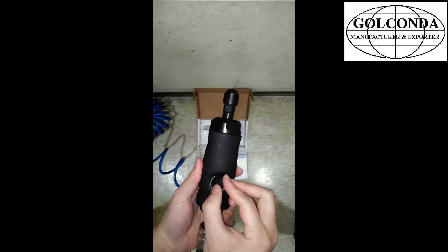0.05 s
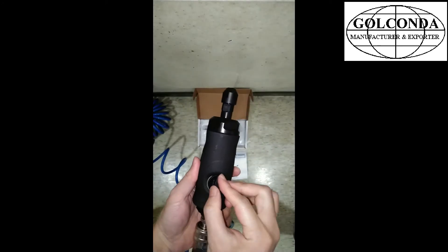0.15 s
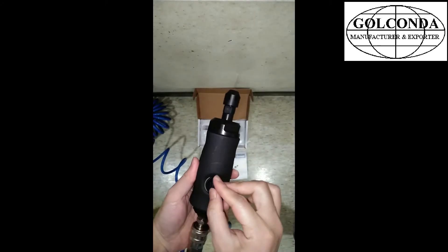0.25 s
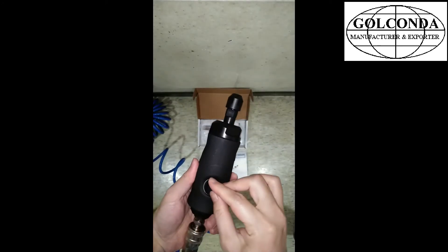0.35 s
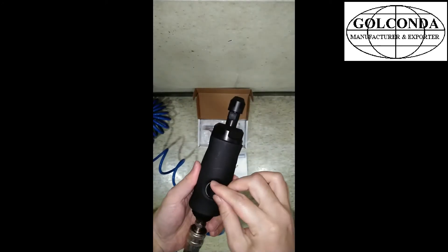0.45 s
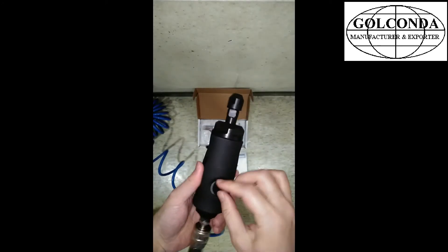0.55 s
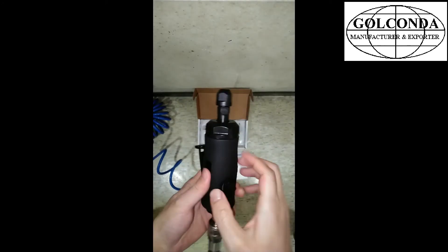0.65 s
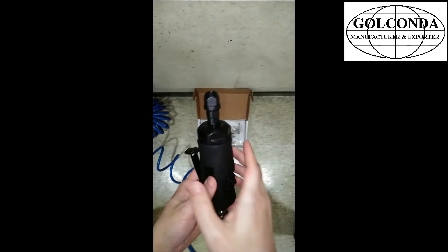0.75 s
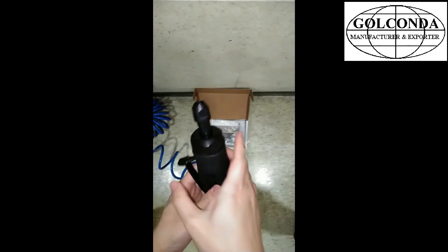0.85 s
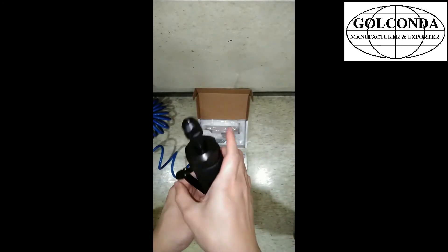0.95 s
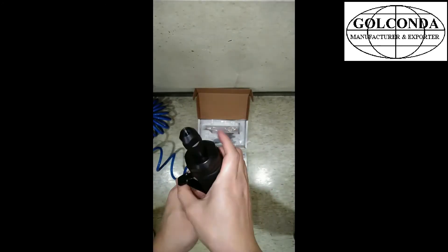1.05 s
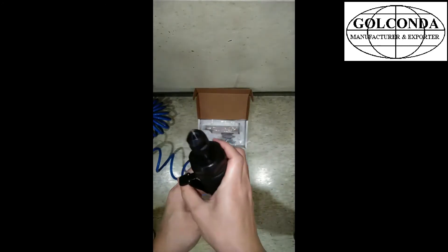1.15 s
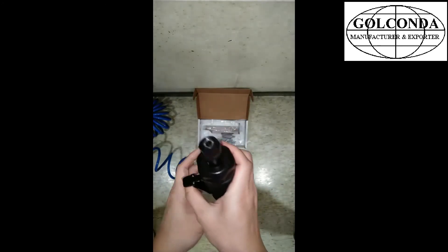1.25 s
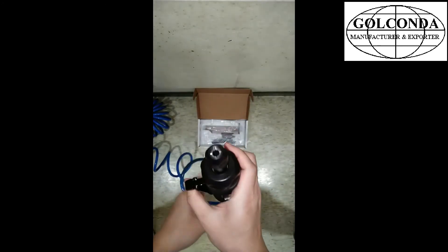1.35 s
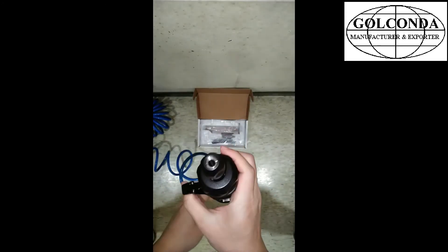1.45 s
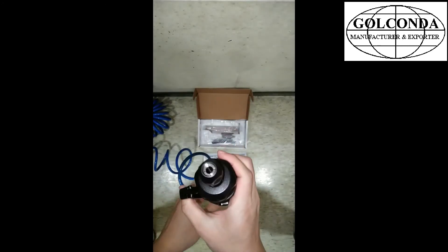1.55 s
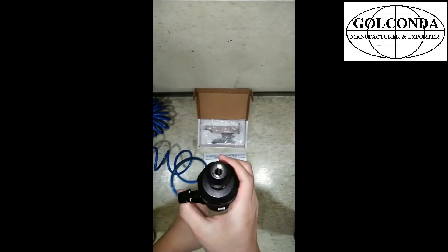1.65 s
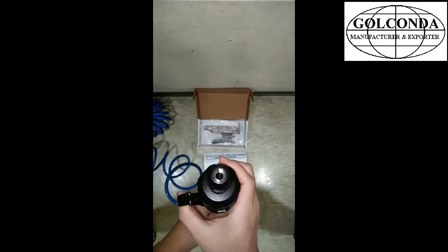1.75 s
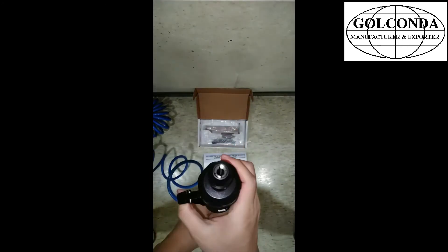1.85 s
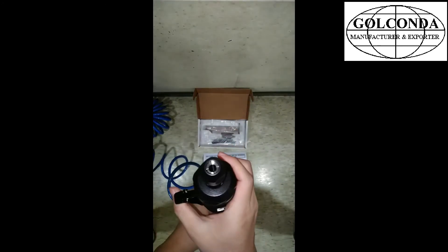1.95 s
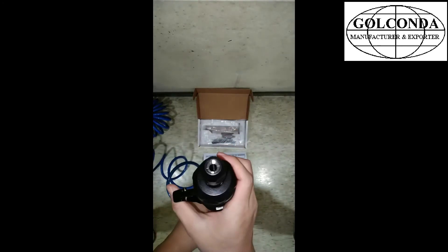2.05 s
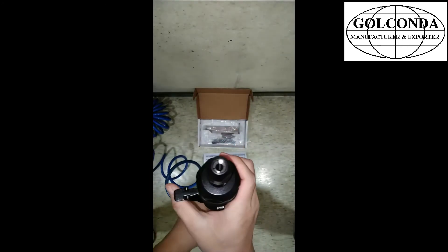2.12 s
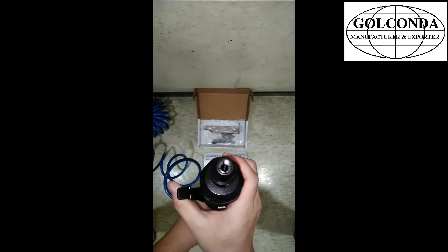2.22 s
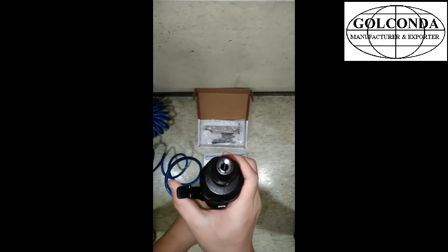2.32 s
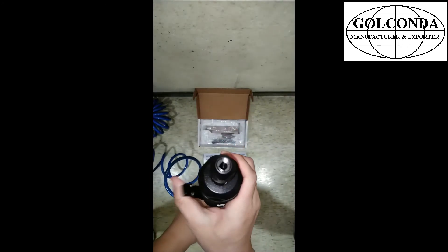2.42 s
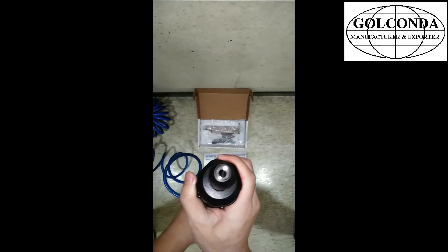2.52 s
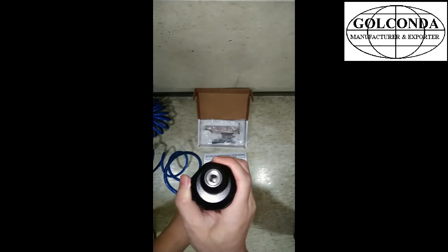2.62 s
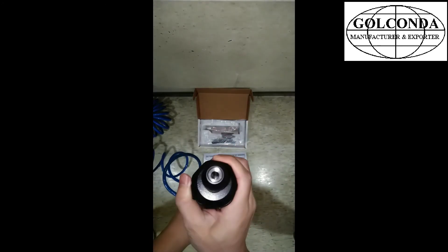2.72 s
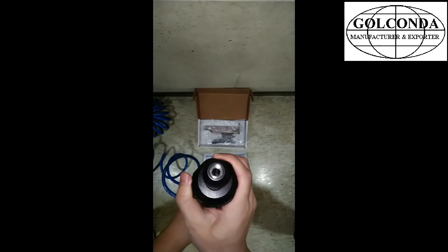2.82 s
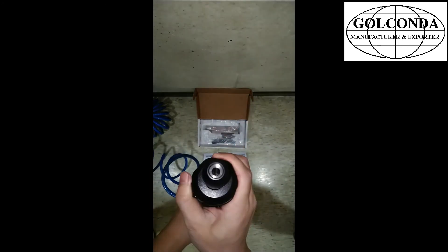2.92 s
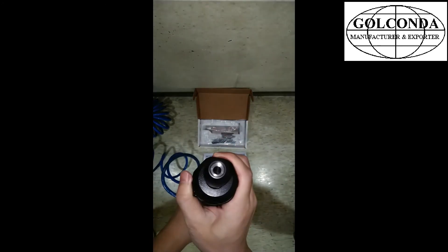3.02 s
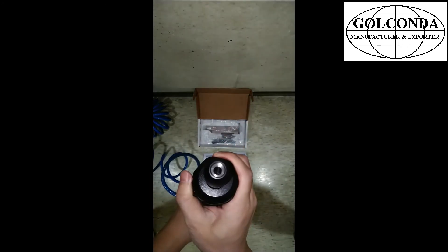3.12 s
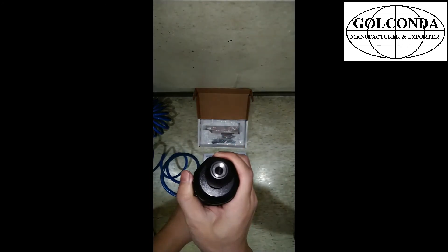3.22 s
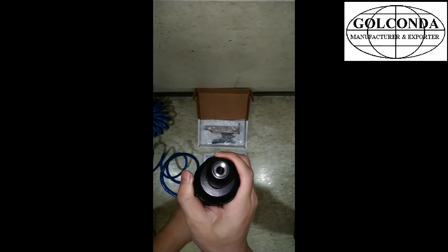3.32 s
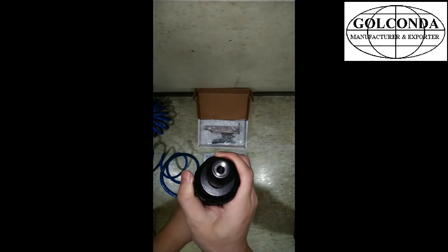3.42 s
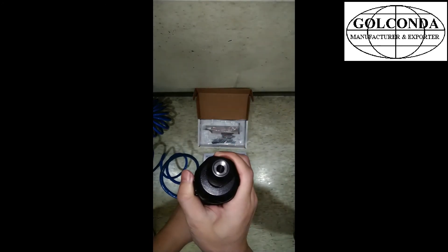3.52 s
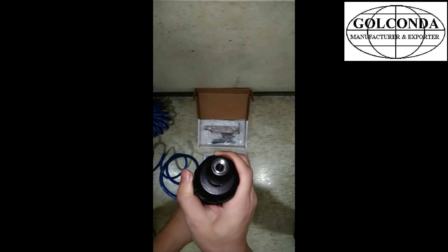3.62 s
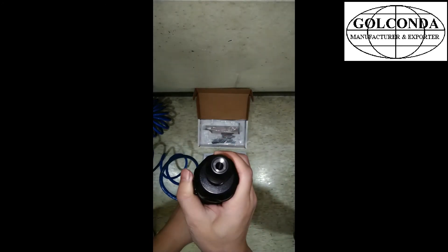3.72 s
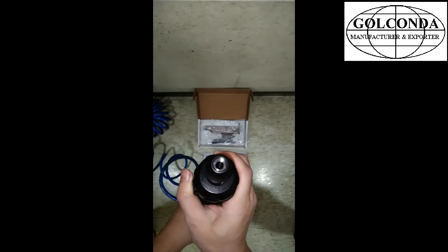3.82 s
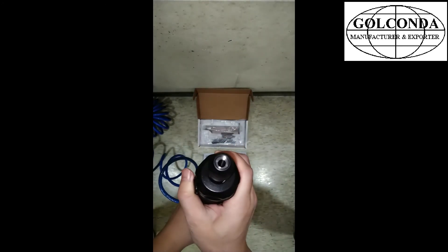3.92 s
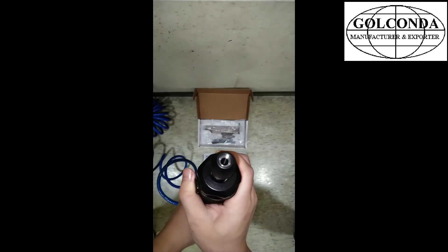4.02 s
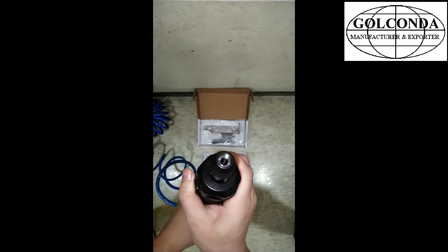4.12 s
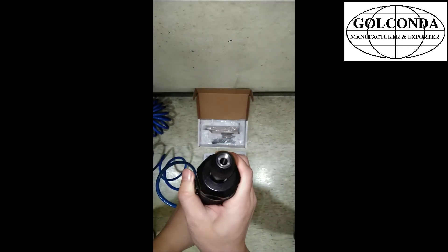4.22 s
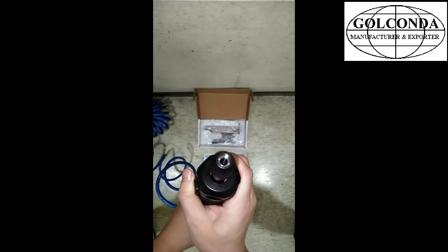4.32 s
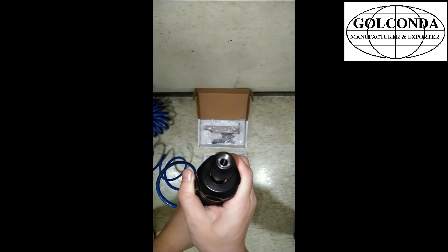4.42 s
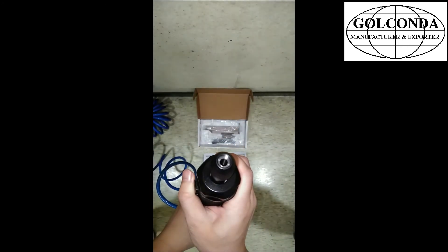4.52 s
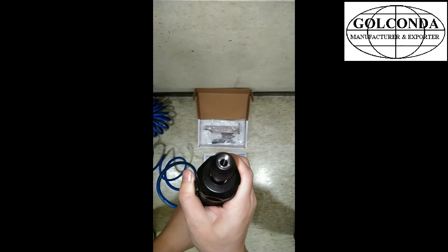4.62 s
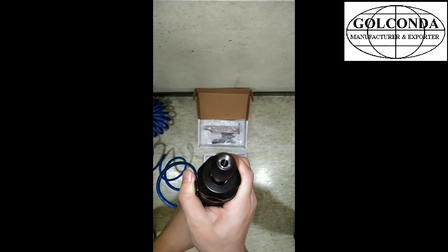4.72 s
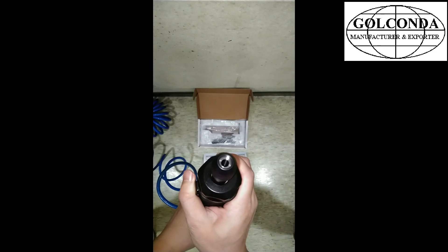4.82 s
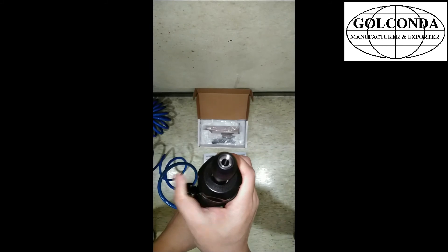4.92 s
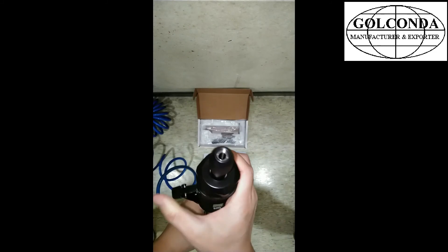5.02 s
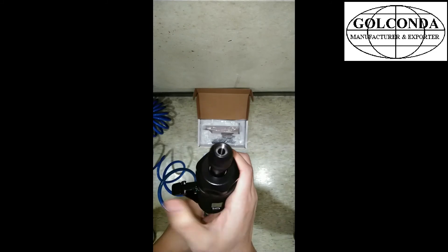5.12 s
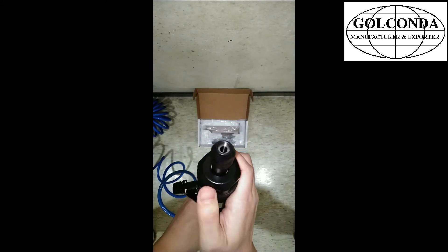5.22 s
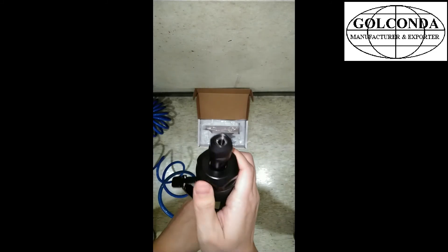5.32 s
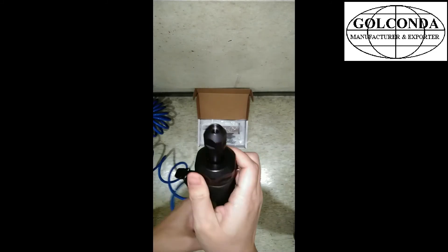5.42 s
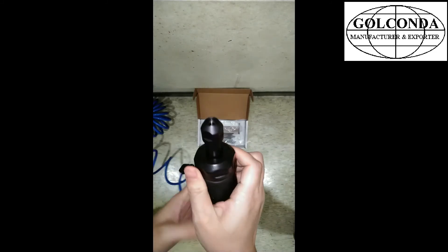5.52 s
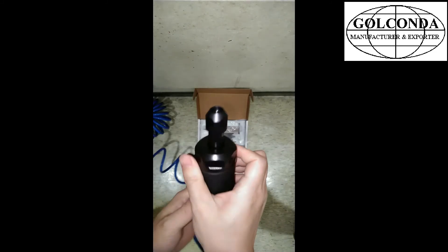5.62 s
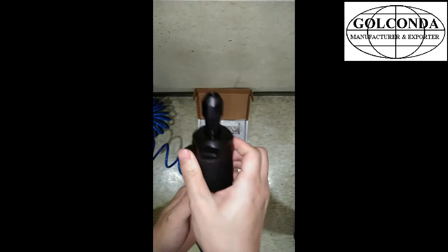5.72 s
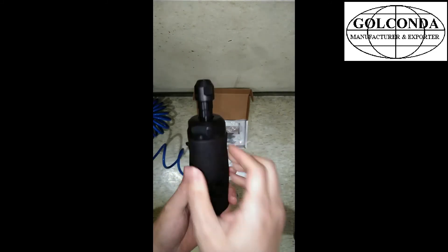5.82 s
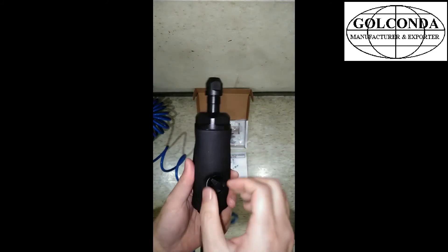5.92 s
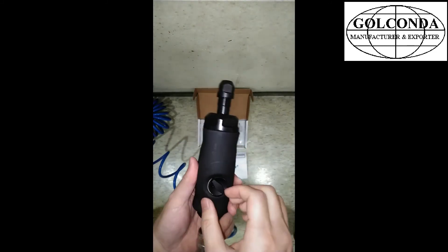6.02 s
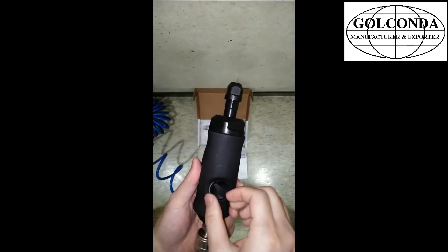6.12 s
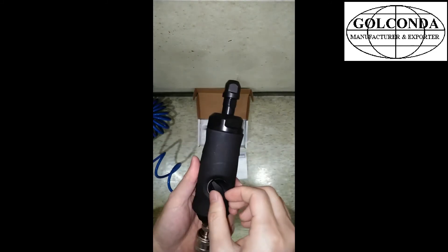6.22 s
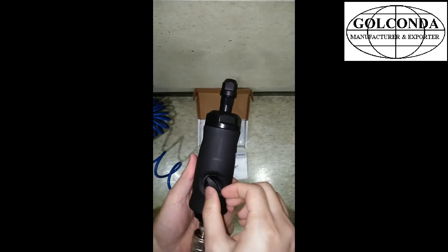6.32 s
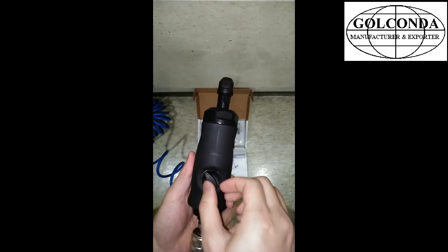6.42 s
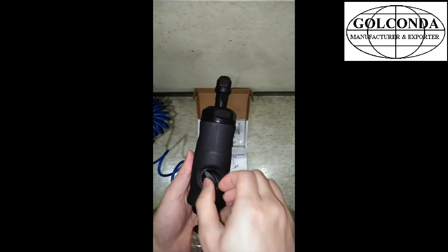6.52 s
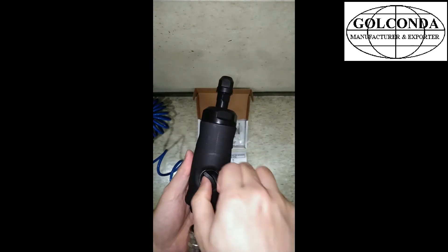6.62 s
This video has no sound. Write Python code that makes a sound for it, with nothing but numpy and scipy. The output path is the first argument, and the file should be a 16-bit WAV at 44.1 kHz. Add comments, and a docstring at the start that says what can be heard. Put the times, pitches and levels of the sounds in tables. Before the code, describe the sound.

Close up in a small tiled room, entirely on the left, a pneumatic grinder runs with no load. First come a thin air leak and a soft click. The motor spins up with a puff into a siren-like whine and hiss that drops slightly and settles. It stops with a quickly falling sputter, a sharp lever snap and a short metallic whir, leaving the faint leak.

```python
"""An air die grinder runs free, close up in a small tiled room, on the left channel only.
The safety catch clicks, the lever opens the valve and the four-vane motor whines up: its vanes chop
the air like a siren, the exhaust hisses, and the pitch sags with the hose pressure. On release it
burps down, the lever snaps back and the bearings coast, ringing the steel body.
Underneath, the hose coupling leaks faintly over a low room tone."""
import sys
import numpy as np
from scipy import signal
from scipy.fft import rfft, irfft
from scipy.io import wavfile
from scipy.ndimage import map_coordinates

SR = 44100
rng = np.random.default_rng(int(sys.argv[2]) if len(sys.argv) > 2 else 0)


def wrap_up_sound(samples):
    """Save the sound to the file named by the first command line argument, as 16-bit audio."""
    columns = np.atleast_2d(samples).T
    # keep every value between -1 and 1, then stretch to whole-number steps
    tamed = np.clip(columns, -1, 1)
    steps = np.round(tamed * 32767).astype(np.int16)
    wavfile.write(sys.argv[1], SR, steps)


N = 293596
T = np.arange(N) / SR

# Colour of the room tone: frequency_hz, relative_db
ROOM_TONE_SPECTRUM = [(20, 3), (50, 2), (90, -4), (170, -2.5), (300, -10.5), (550, -15.5), (1000, -19.5),
                      (2000, -25.5), (3500, -33), (8000, -38.5), (16000, -46)]
# Colour of the coupling's hiss: frequency_hz, relative_db
LEAK_SPECTRUM = [(2000, -33), (5000, -20.5), (6800, -12), (7500, -12.5), (9300, -7), (11100, -1.5),
                 (12800, -8), (14500, -9), (15500, -6)]
# Knocks of catch and lever: start_s, level_db, centre_hz, t60_s, housing_relative_db
KNOCKS = [(1.683, -42.5, 7000, 0.024, -9), (1.690, -47, 8000, 0.019, -6),
          (5.0415, -15.5, 8030, 0.022, -11.5), (5.0453, -16.5, 12400, 0.025, -23),
          (5.048, -27, 11500, 0.019, -18), (5.057, -20, 11700, 0.017, -10)]
# Bursts of big puffs, round at the start and sharp at the stop: peak_s, level_db, tilt_db_per_octave
PUFF_BURSTS = [(2.456, -22, -7.5), (4.999, -14, -4)]
# Tone shaping of the exhaust passage: frequency_hz, gain_db
PASSAGE_RESPONSE = [(40, -11), (130, -17), (220, -1.5), (300, 4.5), (410, -8.5), (520, 2), (900, 0),
                    (1300, 4), (1600, -10), (1900, -11.5), (2600, -20), (5000, -19), (12000, -44)]
# Colour of the exhaust hiss: frequency_hz, relative_db
JET_SPECTRUM = [(60, -15.5), (250, -11.5), (550, -18.5), (1000, -7), (1900, -11.5), (2600, 3), (3500, -7.5),
                (5500, -0.5), (7600, -4.5), (8800, 1.5), (10800, 7), (13000, -1), (14600, 1), (16000, -9.5)]
# Weaker vane harmonics: vane_harmonic, early_db, settled_db
WEAK_HARMONICS = [(3, -46, -57), (4, -43, -51.5), (5, -51.5, -49), (6, -51, -54), (9, -48.5, -49.5),
                  (11, -40.5, -45), (12, -44, -47), (13, -39, -47.5), (14, -47.5, -40.5), (15, -53, -48),
                  (16, -41, -47.5), (18, -49, -43)]
# Contour of the shaft harmonics that unequal vanes add: frequency_hz, level_db
SHAFT_CONTOUR = [(190, -57.5), (500, -76), (950, -63), (1300, -52.5), (2100, -60.5), (2600, -46),
                 (3300, -56.5), (5000, -60), (7500, -54), (8800, -47.5), (9500, -54.5), (10500, -41.5),
                 (12800, -50.5), (14200, -50), (16000, -54)]
# Strong vane harmonics, one reflection each:
# vane_harmonic, settled_db, full_hose_change_db, reflection_delay_s, reflection_gain
STRONG_HARMONICS = [(1, -31, -8, .0162, 0.37), (2, -32, -14, .008812, 0.84), (7, -43, 0, 0.01125, 0.68),
                    (8, -45, -6.5, 0.000464, 1)]
# Resonances of the steel body and spindle: pitch_hz, width_hz, gain_db
BODY_MODES = [(1970, 300, -6), (3420, 250, -8), (4290, 48, 3), (4940, 220, -2.5), (5870, 140, -0.5),
              (7300, 400, -8), (8140, 130, -6), (10600, 740, -7.5)]

VANES, SHAFT_HZ, TOP_HZ = 4, 190, 15800  # vane count, nominal shaft rate, treble limit
# Cues: the rotor starts, the lever is let go, the vanes stop blowing, the spindle rests.
START_S, RELEASE_S, STALL_S, REST_S = 2.438, 4.968, 5.2, 5.66
BLOWING = slice(int(START_S * SR), int(STALL_S * SR))
SINCE_START_S = np.maximum(T - START_S, 0)


def undb(db):
    """Decibels to gain."""
    return 10 ** (np.asarray(db) / 20)


def unit(x):
    """Scale to rms 1."""
    return x / np.sqrt(np.mean(x ** 2))


def gain_at(curve, hz):
    """Read an EQ curve of (frequency_hz, gain_db) points as a gain."""
    points_hz, db = np.transpose(curve)
    return undb(np.interp(np.log(np.maximum(hz, 1)), np.log(points_hz), db))


def noise(curve):
    """Noise of rms 1, coloured by an EQ curve."""
    colour = gain_at(curve, np.fft.rfftfreq(N, 1 / SR))
    return unit(irfft(rfft(rng.standard_normal(N)) * colour, N))


def wobble(rate_hz, t=T):
    """Random modulation that glides between values with a spread near 1."""
    steps = rng.standard_normal(2048)
    return np.interp(t * rate_hz, np.arange(len(steps)), steps)


def swell(on_s, rise_s, off_s, fall_s):
    """Smooth attack, hold at 1, smooth release; half way at on_s and off_s."""
    return (1 + np.tanh((T - on_s) / rise_s / 2)) * (1 - np.tanh((T - off_s) / fall_s / 2)) / 4


def decay(t, t60_s):
    """An envelope that falls 60 dB in t60_s."""
    return np.exp(-np.log(1000) * t / t60_s)


def resonate(x, hz, width_hz):
    """One resonance, gain 1 at its centre."""
    return signal.lfilter(*signal.iirpeak(hz, hz / width_hz, fs=SR), x)


def partial(turns, multiple):
    """A sine of rms 1 locked to the rotor."""
    return np.sqrt(2) * np.sin(2 * np.pi * (multiple * turns + rng.random()))


def room_tone(level_db=-55.5, drift_db=1):
    """A low bed of room air that gently rises and falls."""
    return noise(ROOM_TONE_SPECTRUM) * undb(level_db + drift_db * wobble(3.6))


def coupling_leak(level_db=-61.5, away_db=-5, flutter_db=1.2, turn_s=0.013):
    """Air escapes the coupling in a thin hiss, quieter while the tool is turned away."""
    away = swell(on_s=0.73, rise_s=turn_s, off_s=5.68, fall_s=turn_s)
    return noise(LEAK_SPECTRUM) * undb(level_db + away_db * away + flutter_db * wobble(25))


def catch_and_lever(crack_width_hz=5000):
    """The catch flips; later the sprung lever hits its stop and bounces. Both sound the housing."""
    out = np.zeros(N)
    for start_s, db, hz, t60_s, housing_db in KNOCKS:
        contact = rng.standard_normal(N)
        crack = unit(resonate(resonate(contact, hz, crack_width_hz), hz, crack_width_hz))
        housing = undb(housing_db) * unit(resonate(contact, hz=2700, width_hz=1400))
        envelope = (T >= start_s) * decay(np.abs(T - start_s), t60_s)
        out += (crack + housing) * undb(db) * envelope
    return out


def tiled_reverb(send, low_t60_s=0.29, high_t60_s=0.21, split_hz=3000, predelay_s=.009):
    """Dense reflections off hard walls; the treble dies sooner."""
    t = T[:SR // 2]
    grains = rng.standard_normal(len(t))
    low = signal.sosfilt(signal.butter(2, split_hz, fs=SR, output="sos"), grains)
    tail = (low * decay(t, low_t60_s) + (grains - low) * decay(t, high_t60_s)) * (t > predelay_s)
    return signal.fftconvolve(send, tail / np.sqrt(np.sum(tail ** 2)))[:N]


def hose_surplus(drain_s=.488):
    """Extra pressure in the hose: 1 until the motor starts, then draining to 0."""
    return np.exp(-SINCE_START_S / drain_s)


def rotor(settled_hz=757.4, surplus_hz=125.8, spin_up_s=.052, spin_down_s=.061, brake_power=2.6):
    """Vane rate and speed (0 to 1): a quick spin-up, a hard brake; the rate sags as the hose drains."""
    since_release_s = np.maximum(T - RELEASE_S, 0)
    speed = np.tanh(SINCE_START_S / spin_up_s) / (1 + (since_release_s / spin_down_s) ** brake_power)
    # The pitch is rougher on a full hose and below running speed.
    chatter = 0.00064 + 0.0084 * hose_surplus() ** 2 + 0.0226 * (1 - speed)
    jitter = 1 + 0.00035 * wobble(25) + chatter * wobble(260)
    return (settled_hz + surplus_hz * hose_surplus()) * speed * jitter, speed


def valve_flow(open_lag_s=0.006, shut_lag_s=0.064, surge_db=7, surge_s=0.11):
    """The air's envelope: a surge on opening, a steady hold, then the motor empties."""
    gate = swell(START_S + open_lag_s, 0.0054, RELEASE_S + shut_lag_s, 0.0067)
    return gate * undb(surge_db * np.exp(-SINCE_START_S / surge_s))


def exhaust_hiss(turns, level_db=-33.0, turn_depth=0.6, vane_depth=0.44):
    """A turbulent jet, pulsing with each turn and each vane."""
    pulse = 1 + turn_depth * np.cos(2 * np.pi * turns) + vane_depth * np.cos(2 * np.pi * VANES * turns)
    return noise(JET_SPECTRUM) * pulse * undb(level_db)


def exhaust_burps(turns, vane_hz, lopsided=0.2, harmonics=14, rise_db_per_s=1454, fall_db_per_s=207):
    """Air pockets puff one by one through the exhaust passage; one side of the rotor blows harder."""
    harmonic = np.arange(1, harmonics + 1)[:, None]
    passage = gain_at(PASSAGE_RESPONSE, harmonic * vane_hz[BLOWING])
    waves = np.sin(2 * np.pi * harmonic * VANES * turns[BLOWING])
    out = np.zeros(N)
    for peak_s, db, tilt_db in PUFF_BURSTS:
        gains = undb(tilt_db * np.log2(harmonic))
        puffs = np.sum(gains * passage * waves, axis=0) / np.sqrt(np.sum(gains ** 2) / 2)
        from_peak_s = T[BLOWING] - peak_s
        fade_db = np.minimum(rise_db_per_s * from_peak_s, -fall_db_per_s * from_peak_s)
        out[BLOWING] += undb(db + fade_db) * puffs
    return out * (1 + lopsided * np.cos(2 * np.pi * turns))


def rotor_overtones(turns, shaft_hz, drift_db=1.5, flutter_db=2.5, shaft_trim_db=-0.64):
    """Weak vane harmonics and the buzz of unequal vanes grow with speed, each wavering on its own."""
    t = T[BLOWING]
    settled = np.interp(t, [3.3, 4.2], [0, 1])  # the timbre settles between these seconds
    vane_db = {VANES * round(k): early + (late - early) * settled for k, early, late in WEAK_HARMONICS}
    whine_multiples = [VANES * round(row[0]) for row in STRONG_HARMONICS]
    out = np.zeros(N)
    for multiple in np.setdiff1d(np.arange(1, TOP_HZ // SHAFT_HZ), whine_multiples):
        if multiple in vane_db:
            gain = undb(vane_db[multiple])
        else:
            gain = undb(shaft_trim_db) * gain_at(SHAFT_CONTOUR, multiple * shaft_hz[BLOWING])
        waver_db = drift_db * wobble(5, t) + flutter_db * wobble(16, t)
        out[BLOWING] += gain * undb(waver_db) * partial(turns[BLOWING], multiple)
    return out * np.minimum(shaft_hz / SHAFT_HZ, 1) ** 3


def vane_whine(turns, speed, flutter_db=0.5):
    """The vanes' siren near full speed; as it sags, a reflection swells and thins each harmonic."""
    out = np.zeros(N)
    for harmonic, settled_db, full_hose_db, delay_s, reflection_gain in STRONG_HARMONICS:
        level_db = settled_db + full_hose_db * hose_surplus() - flutter_db * wobble(12)
        tone = undb(level_db) * partial(turns, VANES * round(harmonic))
        reflection = map_coordinates(tone, [(T - delay_s) * SR], order=3)
        out += tone + reflection_gain * reflection
    return out * np.interp(speed, [.86, .99], [0, 1])


def coasting_bearings(level_db=-47, fade_power=2.12):
    """Rolling balls ring the steel body, fading as the spindle slows evenly to rest."""
    rolling = rng.standard_normal(N)
    ring = np.zeros(N)
    for hz, width_hz, db in BODY_MODES:
        ring += undb(db) * resonate(resonate(rolling, hz, 2 * width_hz), hz, 2 * width_hz)
    speed = np.interp(T, [RELEASE_S, REST_S], [1, 0], left=0)
    return unit(ring) * undb(level_db) * speed ** fade_power


def scene(noise_dry_db=-2, noise_send_db=-6.5, burp_send_db=-10, overtone_send_db=-8, whine_send_db=-22):
    """The rotor's angle drives the tones and exhaust; the tool's layers feed the room's reverb."""
    vane_hz, speed = rotor()
    shaft_hz = vane_hz / VANES
    turns = np.cumsum(shaft_hz) / SR
    flow = valve_flow()
    whine = vane_whine(turns, speed)
    overtones = flow * rotor_overtones(turns, shaft_hz)
    burps = exhaust_burps(turns, vane_hz)
    noises = flow * exhaust_hiss(turns) + coasting_bearings() + catch_and_lever()
    direct = whine + overtones + burps + undb(noise_dry_db) * noises
    send = (undb(noise_send_db) * noises + undb(burp_send_db) * burps
            + undb(overtone_send_db) * overtones + undb(whine_send_db) * whine)
    left = direct + tiled_reverb(send) + room_tone() + coupling_leak()
    return np.array([left, np.zeros(N)])


def record(dry, gain_db=6):
    """Master gain and a steep high cut."""
    high_cut = signal.ellip(12, .2, 80, TOP_HZ, fs=SR, output="sos")
    return signal.sosfilt(high_cut, undb(gain_db) * dry)


dry = scene()
out = record(dry)
wrap_up_sound(out)
```